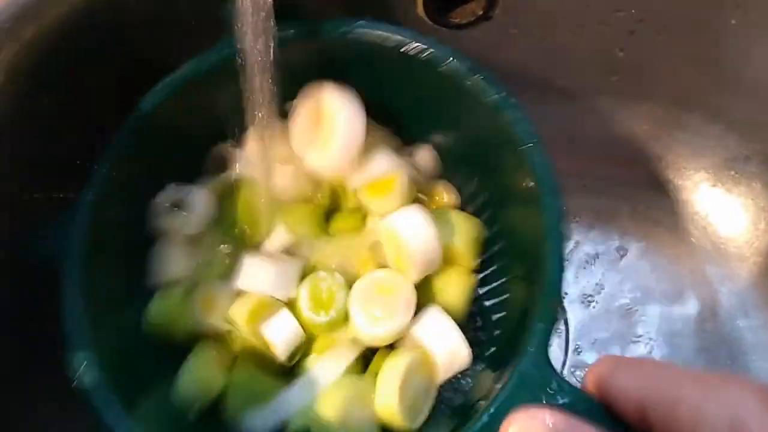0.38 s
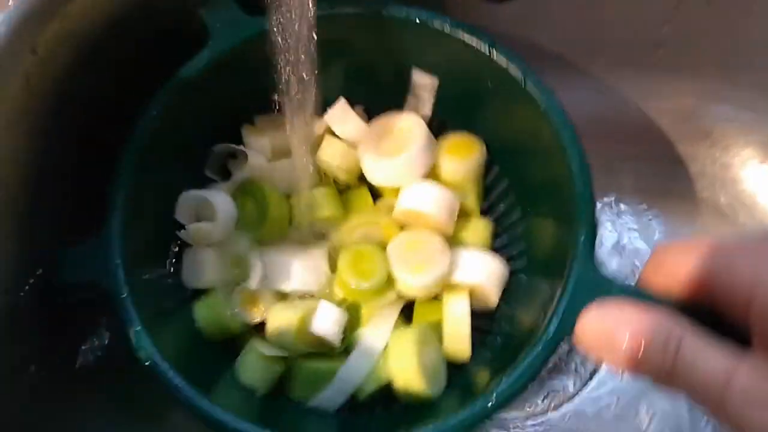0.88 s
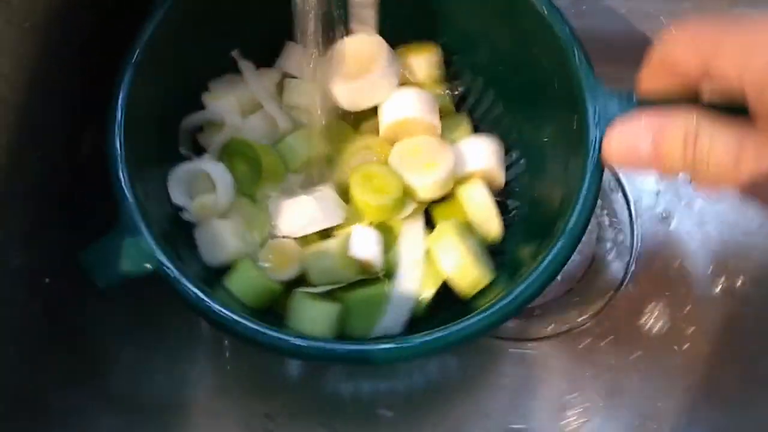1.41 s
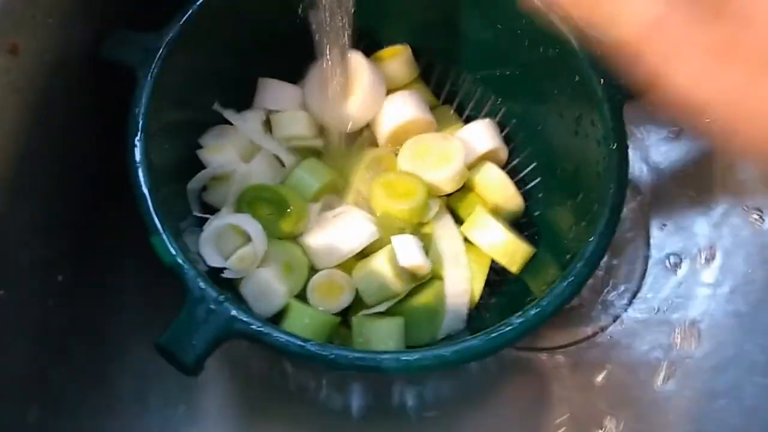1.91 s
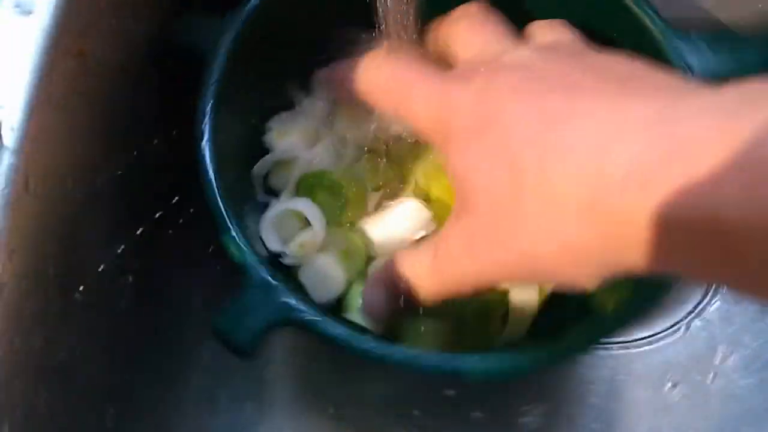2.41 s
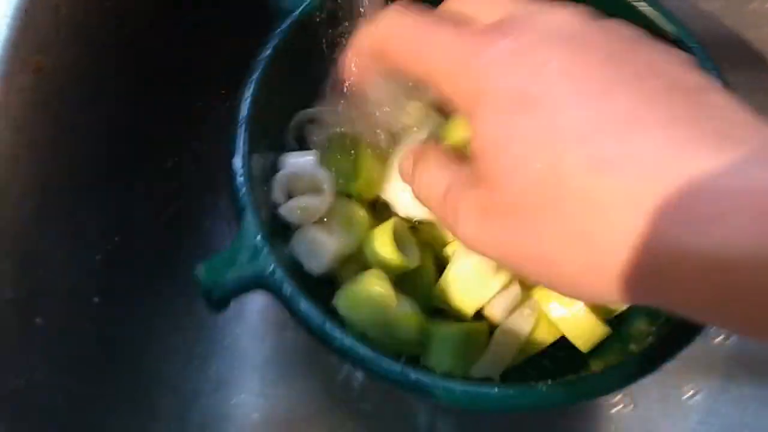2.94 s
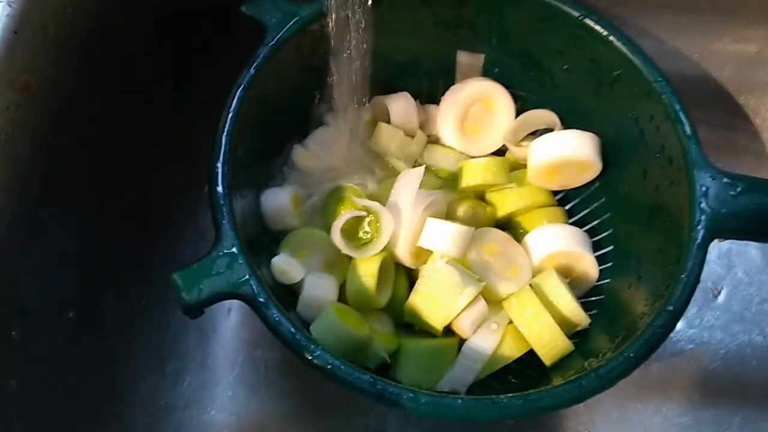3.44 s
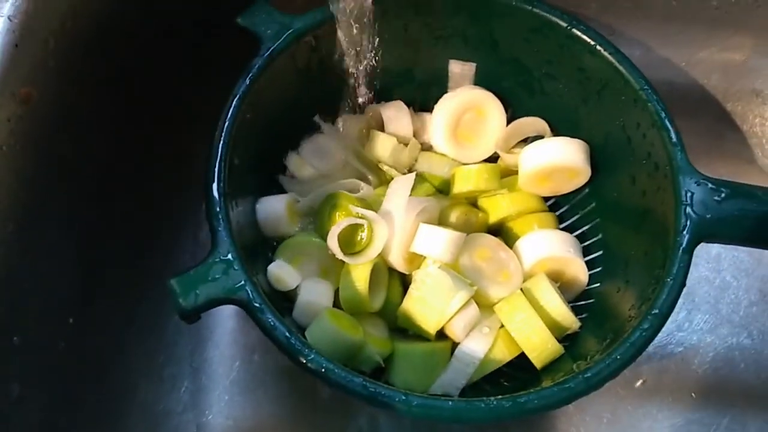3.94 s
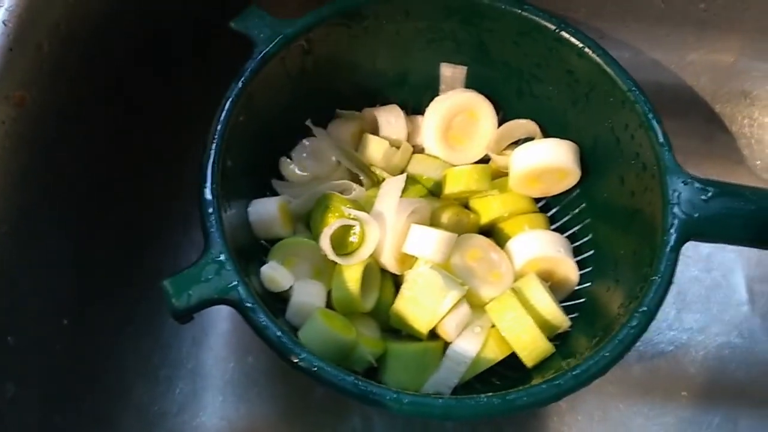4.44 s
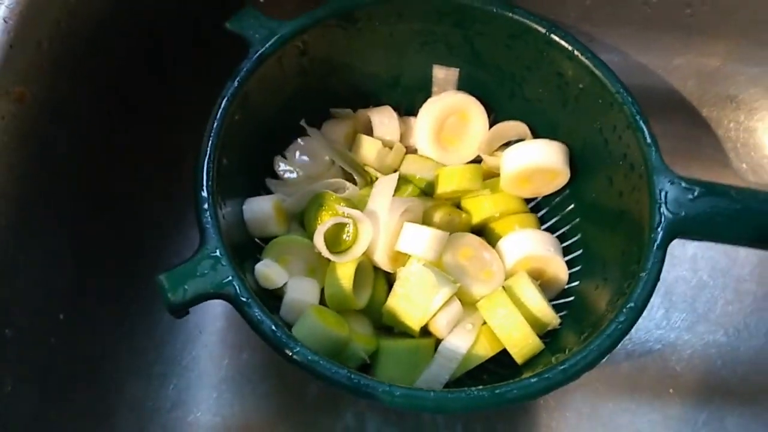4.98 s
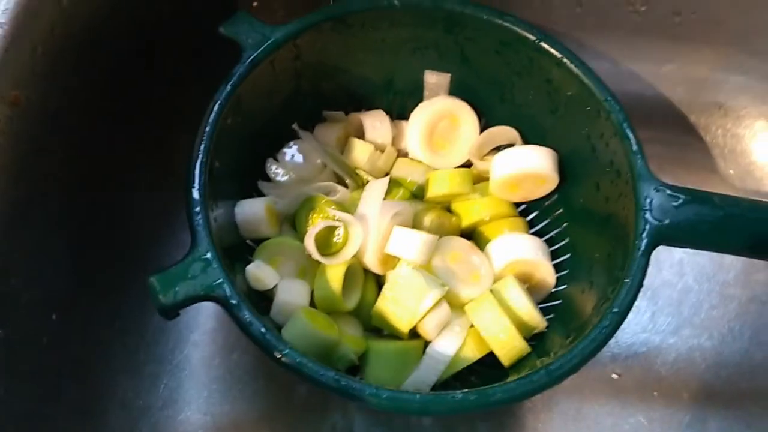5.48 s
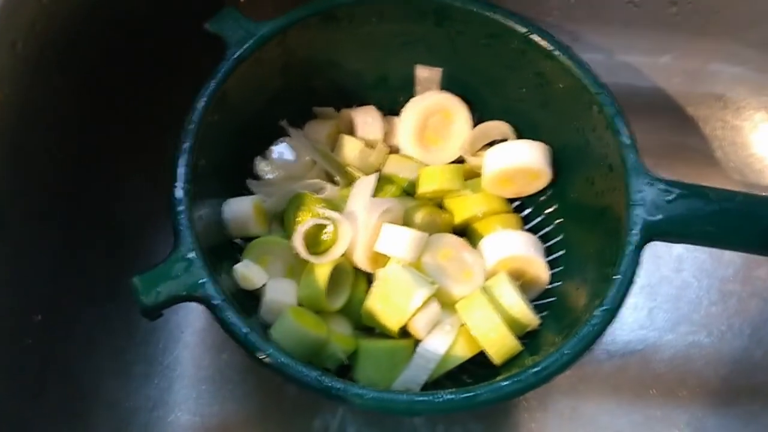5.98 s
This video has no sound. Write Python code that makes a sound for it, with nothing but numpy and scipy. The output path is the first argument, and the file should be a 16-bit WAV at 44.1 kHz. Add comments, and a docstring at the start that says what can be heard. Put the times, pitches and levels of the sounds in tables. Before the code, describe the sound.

Close stereo sound at a steel kitchen sink indoors. From 0 to 0.8 s, a colander of chopped vegetables is shaken under the tap: four or so swishing bursts of spray with plastic knocks, ending in a loud crack and metallic boom at 0.85 s. Smaller knocks follow near 1.1 s, then the steady hissing, gurgling stream returns, with spatters around 1.5 s and a knock at 1.7 s. At 2.2 s a very brief falling wet squeak leads into a hand stirring, with splashes and bumps until about 3.1 s. Crisp spatter continues, and a sharp plastic knock comes at 3.55 s. The tap closes around 4.1 s; spray collapses into last spits, then hollow drips, drumming runoff and bright tinkling drops on steel until about 5.6 s. Near quiet follows, with a small drip at 5.9 s over low room tone and faint hum.

```python
"""Knocks and thrown water come first: cut vegetables in a plastic colander, shaken in a steel sink under a tap.
Spray is dense droplets, snaps, hiss and ringing air pockets; drained water drums the modes of the basin.
Knocks crack the plastic and boom the panels, wet skin squeaks by stick-slip, narrow resonances ring briefly.
The tap is shut near 4 s and the colander drips out in tinkling drops. Room tone and a 100 Hz mains hum lie below.
Two microphone ports hear it all with a frequency-dependent lag and level, plus noise of their own."""
import sys
import numpy as np
from scipy import signal
from scipy.fft import rfft, irfft, next_fast_len
from scipy.io import wavfile

SR = 44100
rng = np.random.default_rng(int(sys.argv[2]) if len(sys.argv) > 2 else 0)


def pcm_store(signal):
    """Save signal as 16-bit PCM."""
    levels = np.round(np.clip(np.atleast_2d(signal), -1, 1) * 32767)
    wavfile.write(sys.argv[1], SR, levels.astype(np.int16).T)


def linear_from_db(decibels):
    """Turn decibels (scalar or array-like) into linear amplitude factors; 0 gives 1."""
    return 10 ** (np.asarray(decibels, float) / 20)


N = 269451


def rms_one(x):
    """Scales to rms 1."""
    return x / np.sqrt(np.mean(x ** 2) + 1e-20)


def in_time(rows, outside_db=None):
    """Interpolates each column over the scene; the first column is time_s."""
    time_s, *columns = np.transpose(rows)
    t = np.arange(N) / SR
    return [np.interp(t, time_s, column, outside_db, outside_db) for column in columns]


def at_hz(points, hz):
    """Interpolates a curve over log frequency."""
    points_hz, values = np.transpose(points)
    return np.interp(np.log(hz), np.log(points_hz), values)


def band(x, low_hz, high_hz):
    """Butterworth band-pass."""
    sos = signal.butter(2, [low_hz, min(high_hz, .45 * SR)], "band", fs=SR, output="sos")
    return signal.sosfilt(sos, x)


def drift(rate_hz):
    """Slow chance of rms 1: noise on every 40th sample through a double one-pole low-pass."""
    r = np.exp(-80 * np.pi * rate_hz / SR)
    noise = rng.standard_normal(N // 40 + 2002)
    slow = signal.lfilter([1], [1, -2 * r, r * r], noise)[2000:]  # skip the filter's start
    return np.interp(np.arange(N) / 40, np.arange(len(slow)), rms_one(slow))


def ring(clicks, hz, t60_s):
    """Damped resonator: a unit click starts a sine of initial height 1."""
    r = 1000. ** (-1 / (t60_s * SR))
    w = 2 * np.pi * hz / SR
    return signal.lfilter([0, np.sin(w)], [1, -2 * r * np.cos(w), r * r], clicks + 1e-18)


def strike(modes, contact, uneven_db):
    """Mode strengths wander with the spot that is hit; neighbouring modes move in opposite phase."""
    out = 0
    for k, (hz, level_db, t60_s) in enumerate(modes):
        push = contact * linear_from_db(uneven_db * drift(6.9))
        out = out + (-1) ** k * linear_from_db(level_db) * ring(push, hz, t60_s)
    return out


def drops(per_s, spread_db, clump_db, clump_rate_hz):
    """Random impacts of uneven size and either sign, whose rate drifts so that they clump."""
    sizes = linear_from_db(spread_db * np.minimum(rng.exponential(1, N), 3.5)) * rng.choice([-1, 1], N)
    chance = per_s * linear_from_db(clump_db * drift(clump_rate_hz)) / SR
    return sizes * (rng.random(N) < chance)


def burst(clicks, length_s, rise_s=0.0014):
    """Wet, ragged contact: each click opens a short puff of noise."""
    rise, fall = np.exp(-1 / (rise_s * SR)), np.exp(-1 / (length_s * SR))
    poles = np.convolve([1, -rise], [1, -fall])
    opening = signal.lfilter([1 - rise], poles, np.abs(clicks) + 1e-18)
    return opening * rng.standard_normal(N)


def bubbles(born, low_hz, high_hz, cycles):
    """Air pockets of mixed size: each impact rings at one of 16 pitches, down 60 dB after some cycles."""
    pitches = np.geomspace(low_hz, high_hz, num=16)
    dealt = rng.integers(0, len(pitches), N)
    ringing = sum(ring(born * (dealt == k), hz, cycles / hz) for k, hz in enumerate(pitches))
    return rms_one(band(ringing, 1.44 * low_hz, 5.8 * high_hz))


def coloured(x, spectrum, patchy_db):
    """Narrow bands, each with its own gain and flicker; signs alternate so that neighbours add; rms 1."""
    out = 0
    edges = np.geomspace(max(spectrum[0][0], 25), min(spectrum[-1][0], 16500), num=14)
    for k, (low, high) in enumerate(zip(edges, edges[1:])):
        gain = linear_from_db(at_hz(spectrum, np.sqrt(low * high)) + patchy_db * drift(38.0))
        out = out + (-1) ** k * band(x, low, high) * gain
    return rms_one(out)


SWELL_DB, FALL_PER_RISE = 17.5, 1.44  # climb within rise_s; default fall time over rise time


def swells(peak_s, rise_s, peak_db, fall_s=None):
    """Gain of brief swells: each climbs to its peak and sinks again, evenly in dB."""
    t = np.arange(0, N + 40, 40) / SR
    late_s = t[:, None] - peak_s
    if fall_s is None:
        fall_s = FALL_PER_RISE * rise_s
    rising, falling = -late_s / np.maximum(rise_s, .002), late_s / np.maximum(fall_s, .002)
    gain = linear_from_db(peak_db - SWELL_DB * np.where(late_s < 0, rising, falling))
    return np.interp(np.arange(N) / SR, t, np.sqrt(np.sum(gain ** 2, axis=1)))


# room spectrum before rms scaling: hz, relative_db
ROOM_TONE = [(25, 8.5), (70, -1.5), (150, 23), (300, 7), (600, -34.5), (1000, -38.5), (1600, -18.5),
             (2500, -33), (4000, -27.5), (9000, -19.5), (15000, -30)]
ROOM_TONE_DB = -51.5


def room():
    """Low room tone: noise in flickering bands."""
    return linear_from_db(ROOM_TONE_DB) * coloured(rng.standard_normal(N), ROOM_TONE, patchy_db=-3.0)


# mains hum level: time_s, level_db
HUM = [(0.0, -59), (0.2, -52), (0.87, -53), (1.04, -66.5), (1.75, -53.5), (1.85, -55), (2.5, -53),
       (2.67, -55), (2.84, -51.5), (3.47, -50.5), (3.76, -58), (3.91, -53), (4.44, -49), (4.99, -49),
       (5.39, -48), (6.11, -51.5)]
HUM_HZ = 100


def hum():
    """Mains hum: one sine, wavering slightly in phase and level."""
    phase = 2 * np.pi * HUM_HZ * np.arange(N) / SR + .15 * drift(1.5)
    return np.sqrt(2) * np.sin(phase) * linear_from_db(in_time(HUM)[0] + 0.42 * drift(13))


# water falling on the basin between gushes: time_s, drumming_db, high_ring_db
RUNOFF = [(0, -40.5, -36), (.8, -39, -38.5), (.9, -41, -43.5), (1.15, -61, -45), (1.5, -43.5, -34.5),
          (2, -43, -41), (2.3, -36.5, -35), (2.7, -43.5, -32.5), (2.85, -39.5, -33.5), (3.3, -37, -38),
          (3.6, -41.5, -46), (4.08, -45, -33), (4.3, -45, -39.5), (4.7, -38.5, -41), (5.15, -36, -36.5),
          (5.58, -44, -42.5), (5.7, -70, -59.5), (5.85, -78, -77), (6.11, -57, -60)]
TAP_SHUT_S = 4.1
PORT_RUMBLE_DB, PORT_HISS_DB = -57.5, -75.5
RUMBLE_FOLLOWS = .6  # share of the hum's swing in dB
LATE_NOISE_DB = -17  # against high_ring_db


def port_noise():
    """Separate at each port: low rumble, faint hiss and, after the tap is shut, faint 1.9-2.7 kHz noise."""
    white = rng.standard_normal((3, 2, N))
    shut = np.arange(N) > TAP_SHUT_S * SR
    late_gain = shut * linear_from_db(in_time(RUNOFF)[1] + LATE_NOISE_DB + 3.0 * drift(30))
    late_noise = late_gain * rms_one(band(white[2], 1900, 2700))
    hum_swing_db = in_time(HUM)[0] - HUM[-1][1]
    rumble_gain = linear_from_db(PORT_RUMBLE_DB + RUMBLE_FOLLOWS * hum_swing_db + 2.5 * drift(5))
    rumble = rumble_gain * rms_one(band(white[0], 40.0, 140.0))
    hiss = linear_from_db(PORT_HISS_DB) * rms_one(band(white[1], 1600.0, 9000.0))
    return rumble + late_noise + hiss


# brief narrow ringing in the spray, later tinkling drops: start_s, length_s, pitch_hz, level_db (before trim)
TINKLES = [(2.915, 0.037, 5300, -35), (3.345, 0.043, 5560, -31), (3.5, .045, 5300, -37.5),
           (4.12, 0.15, 3610, -51), (4.422, 0.075, 5730, -57), (4.425, 0.031, 7600, -70),
           (4.481, 0.051, 3580, -58), (4.633, .05, 8600, -65), (4.74, 0.025, 9200, -64),
           (4.76, 0.036, 5780, -64), (5.336, 0.023, 3700, -62), (5.339, .03, 4900, -51),
           (5.542, 0.015, 4630, -47), (4.407, 0.033, 11700, -62), (4.326, 0.057, 3680, -50),
           (4.416, 0.044, 5000, -57), (4.495, 0.11, 4850, -59), (4.581, 0.072, 5840, -51),
           (4.588, 0.044, 5100, -50), (4.62, 0.032, 6750, -55), (4.622, 0.087, 7300, -68),
           (4.693, 0.075, 4800, -50.5), (4.709, 0.018, 3600, -43), (4.694, 0.06, 5910, -55),
           (4.906, 0.13, 5850, -59.5), (4.958, 0.049, 4900, -53), (5.001, 0.1, 7370, -63.5),
           (5.059, 0.187, 5240, -55.5), (5.113, 0.19, 4870, -55), (5.142, 0.032, 3340, -43.5),
           (5.305, 0.16, 5870, -62.5), (5.444, 0.15, 4940, -52), (5.492, 0.088, 5280, -58),
           (5.504, 0.012, 5750, -38.5), (4.617, 0.022, 11700, -58), (4.703, 0.044, 11000, -62),
           (4.904, 0.11, 9450, -64.5), (5.257, 0.04, 9340, -69), (5.819, 0.022, 1980, -49),
           (5.865, 0.14, 2000, -47.5), (6.02, 0.084, 1990, -56), (5.878, 0.029, 4650, -48.5)]
TINKLE_TRIM_DB = -15.5


def tinkles():
    """Short runs of uneven taps each excite one narrow resonance, which rings briefly."""
    out = np.zeros(N)
    impacts = drops(170, spread_db=3.5, clump_db=3.0, clump_rate_hz=30)
    taps = rms_one(burst(impacts, .001, rise_s=.0003))
    for start_s, length_s, pitch_hz, level_db in TINKLES:
        start, stop = round(start_s * SR), round((start_s + length_s) * SR)
        run = np.append(taps[start:stop], np.zeros(SR // 20))[:N - start]  # room to ring out
        sos = signal.butter(2, [.96 * pitch_hz, 1.04 * pitch_hz], "band", fs=SR, output="sos")
        ringing = signal.sosfilt(sos, ring(run, pitch_hz, .028))
        out[start:start + len(run)] += linear_from_db(level_db + TINKLE_TRIM_DB) * ringing
    return out


# wet skin slipping on a stalk: time_s, pitch_hz, level_db
SQUEAK = [(2.212, 1776, -27), (2.22, 1684, -25.5), (2.227, 1268, -21.5), (2.238, 1284, -19),
          (2.246, 868, -24.5), (2.254, 880, -21), (2.265, 985, -26.5)]


def squeak():
    """Stick-slip slows down: a rough falling tone with two overtones."""
    pitch_hz = in_time(SQUEAK)[0]
    level_db = in_time(SQUEAK, outside_db=-120)[1]
    phase = 2 * np.pi * np.cumsum(pitch_hz * (1 + .04 * drift(200))) / SR
    tone = np.sin(phase) + 1.07 * np.sin(2 * phase) + 0.5 * np.sin(3 * phase)
    return linear_from_db(level_db + 2.5 * drift(150)) * tone


# steel basin, high modes woken by sharp drops: hz, level_db, t60_s
BASIN_HIGH = [(1940, -1, .045), (2020, -3, .04), (2560, -2, .04), (2640, 0, .04), (2890, -11, .035),
              (3120, -13, .045), (3340, -19, .04)]


def bright_ring(contact, uneven_db):
    """High basin modes, each radiating only near its own pitch."""
    out = 0
    for mode in BASIN_HIGH:
        out = out + band(strike([mode], contact, uneven_db), .93 * mode[0], 1.07 * mode[0])
    return out


# steel basin, low panel modes: hz, level_db, t60_s
BASIN = [(161.3, -3, 0.08), (170, -0.5, 0.11), (233.6, -7.5, 0.059), (258, -5.5, 0.066), (349, -14, 0.063),
         (508, -9, 0.14), (563, -3.5, 0.016), (624, -3, 0.037), (714, -15.5, 0.027), (942.6, -10.5, 0.024),
         (1257, -1.5, 0.068)]
# gushes from the slots landing on the steel: peak_s, fall_s, drumming_db
GUSHES = [(1.539, 0.042, -41), (1.833, 0.07, -34), (2.706, 0.024, -27), (2.78, 0.023, -36),
          (3.22, 0.027, -44), (3.31, 0.27, -37), (3.495, 0.05, -42.5), (4.102, 0.076, -24),
          (4.25, 0.57, -36), (4.415, 0.037, -31), (4.478, 0.11, -22), (4.811, 0.024, -31),
          (4.836, 0.039, -26.5), (4.912, 0.07, -24), (5.064, 0.04, -30.5), (5.088, 0.026, -27),
          (5.169, 0.022, -22.5), (5.22, 0.25, -32), (5.34, 0.055, -25.5), (5.462, 0.019, -25),
          (5.566, 0.057, -31.5), (5.902, 0.047, -38.5)]
# water thrown by a shake, a hand or a spit of the shut tap: peak_s, rise_s, spray_db, gurgle_db, drumming_db
SLOSHES = [(0, 0.074, -26.5, -29, -40.5), (0.188, 0.12, -26, -40.5, -51), (0.358, 0.046, -22, -27.5, -33),
           (0.512, 0.083, -26, -34, -39.5), (0.671, 0.055, -26.5, -49, -47), (0.746, 0.075, -26, -31, -43),
           (0.854, 0.014, -22.5, -17, -15), (1.074, 0.0051, -53.5, -39, -38),
           (1.128, 0.0031, -50, -30, -45), (1.679, 0.0081, -28, -67, -63),
           (1.742, 0.096, -31.5, -38, -30.5), (1.958, 0.091, -36, -37.5, -34),
           (2.24, 0.11, -25.5, -36.5, -51.5), (2.343, 0.014, -41.5, -27.5, -35),
           (2.375, 0.055, -29.5, -44.5, -43.5), (2.84, 0.12, -36, -36, -31), (2.98, 0.015, -49, -26, -39),
           (3.1, 0.07, -27, -45, -53), (3.575, 0.027, -39, -26, -29.5), (4.041, 0.026, -30, -47, -66),
           (4.134, 0.0087, -38.5, -58, -22), (4.373, 0.017, -36, -35, -44), (4.449, 0.034, -65, -31, -26),
           (4.63, 0.013, -53, -67, -43), (4.716, 0.0083, -45.5, -43, -29), (5.349, 0.016, -72, -33, -35),
           (5.4, 0.074, -79, -40, -48), (5.448, 0.015, -76, -37.5, -30)]
GUSH_RISE_S = 0.0023


def runoff():
    """Drained water on steel: soft lumps move the panel modes below 1.2 kHz, fine drops the high modes."""
    drum_db, high_db = in_time(RUNOFF)
    gush_s, fall_s, gush_db = np.transpose(GUSHES)
    slosh_s, rise_s, _, _, slosh_db = np.transpose(SLOSHES)
    gushing = np.hypot(swells(gush_s, GUSH_RISE_S, gush_db, fall_s), swells(slosh_s, rise_s, slosh_db))
    lumps = burst(drops(250, spread_db=-2.0, clump_db=0.5, clump_rate_hz=15), 0.0036)
    fine = burst(drops(420, spread_db=1.5, clump_db=3.5, clump_rate_hz=40), 0.0016, rise_s=0.00023)
    drumming = rms_one(band(strike(BASIN[:-1], lumps, uneven_db=1.2), 120, 1900))
    high_ring = rms_one(bright_ring(fine, uneven_db=5.5))
    return np.hypot(linear_from_db(drum_db), gushing) * drumming + linear_from_db(high_db) * high_ring


# plastic colander, dull modes of ribs and rim: hz, level_db, t60_s
COLANDER = [(940, -14.5, .03), (1242, -12, 0.041), (1639, -20, 0.023), (3230, -13, 0.0095),
            (5200, -17, .01)]
# colander knocks and water slaps: start_s, crack_db, boom_db, panel_hz, splash_db
BLOWS = [(0.003, -10, -19.5, 242, -29), (0.19, -13, -18, 510, -10), (0.357, -7.5, -15, 300, -22.5),
         (0.67, -12, -33, 500, -14.5), (0.655, -16.5, -19, 500, -38), (0.855, -2, -2.5, 258, -5),
         (1.068, -14.5, -21.5, 624, -27), (1.123, -11, -19, 626, -40), (1.455, -28.5, -31, 226, -16),
         (1.619, -15.5, -39, 159, -19.5), (1.728, -5.5, -10.5, 620, -20), (1.94, -16, -12, 248, -22),
         (2.318, -37.5, -15, 250, -39.5), (2.332, -12.5, -9.5, 630, -5.5), (2.384, -9, -58, 622, -22),
         (2.394, -14, -13.5, 622, -20), (2.69, -15, -55, 589, -35.5), (2.702, -19.5, -21, 181, -38.5),
         (2.776, -34, -12, 260, -32), (2.92, -38, -25.5, 158, -13), (3.087, -24.5, -9.5, 267, -24.5),
         (3.5, -13, -31, 635, -6.5), (3.524, -18, -33, 633, -16.5), (3.562, -0.5, -15.5, 159, -6),
         (4.036, -18, -29, 170, -41), (4.101, -23, -12, 624, -20), (4.323, -30, -19.5, 175, -10),
         (4.418, -33, -36, 230, -36.5)]
# heavy drips once the tap is shut: start_s, boom_db, panel_hz, bright_db
DRIPS = [(4.172, -20.5, 633, -34), (4.251, -24, 240, -58), (4.446, -7.5, 262, -29), (4.57, -23, 183, -34.5),
         (4.64, -17.5, 590, -34), (4.703, -20, 640, -29.5), (4.835, -20, 625, -67),
         (4.911, -15.5, 506, -21.5), (5.081, -12, 165, -36), (5.173, -12.5, 500, -36),
         (5.342, -17, 670, -40), (5.381, -18, 1250, -50), (5.397, -14, 1240, -42), (5.464, -23.5, 513, -57),
         (5.506, -28, 173, -29.5), (5.566, -21, 171, -50), (5.897, -28, 508, -49)]
# single drops on the steel: start_s, bright_db
PLINKS = [(4.109, -55), (4.328, -28.5), (4.356, -31.5), (4.414, -39), (4.436, -30.5), (4.481, -28),
          (4.553, -32), (4.751, -33.5), (4.842, -40), (4.867, -40), (4.981, -35.5), (5.035, -37),
          (5.066, -56), (5.137, -29.5), (5.221, -52), (5.32, -54), (5.418, -43), (5.526, -33.5),
          (5.997, -54)]
BLOW_RING_DB = -38.5  # high modes answer every blow alike
DRIP_TICK_DB = -40.5  # tick against boom
PLINK_BOOM_DB, PLINK_PANEL_HZ = 7, 485  # boom against ring; panel under the slots


def blows():
    """Short contacts: plastic crack, push on the nearest basin panel, bright ring, puff of splash."""
    knocks = [(s, crack, boom, hz, BLOW_RING_DB, linear_from_db(splash)) for s, crack, boom, hz, splash in BLOWS]
    drips = [(s, boom + DRIP_TICK_DB, boom, hz, bright, 0) for s, boom, hz, bright in DRIPS]
    plinks = [(s, -120, bright + PLINK_BOOM_DB, PLINK_PANEL_HZ, bright, 0) for s, bright in PLINKS]
    start_s, crack_db, boom_db, panel_hz, bright_db, puff = np.transpose(knocks + drips + plinks)
    at = np.round(start_s * SR).astype(int)
    clicks = np.zeros((3, N))
    clicks[:, at] = linear_from_db(crack_db), linear_from_db(bright_db), puff
    crack_clicks, bright_clicks, splash_clicks = clicks

    boom = 0
    for k, (hz, level_db, t60_s) in enumerate(BASIN):
        push = np.zeros(N)
        push[at] = linear_from_db(boom_db + level_db - 21.0 * np.abs(np.log2(hz / panel_hz)))  # dB per octave away
        boom = boom + (-1) ** k * ring(push, hz, t60_s)
    boom = band(band(boom, 160, 1400), 67, 1100)

    crack = band(burst(crack_clicks, 0.0071, rise_s=0.0011), 1100, 2800)
    crack = crack + band(0.33 * crack_clicks, 500, 3200)
    crack = crack + strike(COLANDER, crack_clicks, uneven_db=3.5)
    bright = bright_ring(burst(bright_clicks, 0.00064, rise_s=0.0017), uneven_db=3)
    splash = band(burst(splash_clicks, 0.0013, rise_s=0.00017), 1800, 5900)
    return crack + boom + bright + splash


# running water between the sloshes: time_s, spray_db, gurgle_db
FLOW = [(0, -62.5, -46.5), (.83, -33, -42), (.9, -43, -61), (1.05, -40, -41), (1.36, -38.5, -46.5),
        (1.5, -34, -45), (2.1, -33.5, -43.5), (2.45, -35.5, -41.5), (2.65, -27.5, -45.5),
        (2.93, -30.5, -41.5), (3.22, -31.5, -41), (3.35, -27, -43), (3.54, -28.5, -44.5),
        (3.62, -36.5, -49.5), (3.73, -29, -42), (4.02, -42.5, -47), (4.15, -40.5, -46.5), (4.24, -62, -81),
        (4.44, -48.5, -60), (4.55, -77.5, -61.5), (5, -69, -59), (5.3, -71, -70), (6.11, -74, -79)]
# spray spectrum before rms scaling: hz, relative_db
SPRAY = [(600, -27.5), (1200, 3.5), (2000, 5), (3000, 3.5), (4500, 9.5), (6000, 2.5), (7500, -4.5),
         (10000, 4.5), (12500, -21.5), (15500, 5)]
# gobs of water bursting on a stalk or rib: peak_s, fall_s, spray_db
SPATS = [(0.295, 0.028, -28), (0.357, 0.01, -36), (.671, .01, -42), (.747, .01, -35), (1.068, 0.017, -32.5),
         (1.123, 0.017, -28.5), (1.457, .02, -25.5), (1.493, .008, -22), (1.619, .01, -33.5),
         (1.637, .008, -43), (1.727, 0.0196, -31.5), (1.914, .01, -36), (2.061, 0.0091, -24.5),
         (2.098, .01, -29), (2.161, 0.015, -22), (2.331, 0.0094, -26.5), (2.385, .01, -31.5),
         (2.69, .01, -31.5), (2.709, .01, -25.5), (2.875, 0.007, -18.5), (2.918, 0.0076, -21.5),
         (2.947, .008, -26), (3.106, .01, -28.5), (3.328, .01, -29.5), (3.395, 0.0051, -23),
         (3.5, .012, -41.5), (3.561, 0.0083, -28), (3.753, .01, -25), (4.018, 0.0084, -37),
         (4.035, 0.0096, -33), (4.123, 0.025, -26), (4.19, 0.0054, -34), (4.281, 0.041, -39.5),
         (4.324, 0.034, -32.5), (4.372, 0.0067, -35.5), (4.412, .03, -48), (4.572, .01, -51),
         (5.891, .01, -56)]
SPAT_RISE_S = .002
DRIBBLE_PER_S = 2600  # droplet rate after TAP_SHUT_S


def tap():
    """The jet shatters into dense droplets, lone snaps and fizz over a hiss; larger air pockets gurgle."""
    running = np.arange(N) < TAP_SHUT_S * SR
    droplet_rate = np.where(running, 4000, DRIBBLE_PER_S)
    droplets = rms_one(drops(droplet_rate, spread_db=1.5, clump_db=1.5, clump_rate_hz=24))
    lone = drops(80, spread_db=7.5, clump_db=3.5, clump_rate_hz=16)
    snaps = rms_one(burst(lone, 0.0012, rise_s=0.0002))
    hiss = rng.standard_normal(N) * linear_from_db(0.5 * drift(25))
    jet = droplets + np.where(running, 1, .5) * (1.07 * hiss + 0.59 * snaps)
    spray = coloured(jet, SPRAY, patchy_db=4.0)
    small = drops(700, spread_db=5.0, clump_db=5.5, clump_rate_hz=20)
    fizz = bubbles(small, 2600, 9000, cycles=40.0)

    pockets = drops(1100, spread_db=4.0, clump_db=3.0, clump_rate_hz=21)
    plastic = rms_one(strike(COLANDER[:3], pockets, uneven_db=5.0))
    gurgle = bubbles(pockets, 330.0, 2000, cycles=17.6) + 0.88 * plastic

    spray_db, gurgle_db = in_time(FLOW)
    slosh_s, rise_s, thrown_db, gulp_db, _ = np.transpose(SLOSHES)
    spat_s, fall_s, spat_db = np.transpose(SPATS)
    thrown = np.hypot(swells(slosh_s, rise_s, thrown_db), swells(spat_s, SPAT_RISE_S, spat_db, fall_s))
    spray_gain = np.hypot(linear_from_db(spray_db), thrown)
    gurgle_gain = np.hypot(linear_from_db(gurgle_db), swells(slosh_s, rise_s, gulp_db))
    return spray_gain * (spray + linear_from_db(-10.0) * fizz) + gurgle_gain * gurgle


def sink():
    """Everything in and around the basin."""
    return tap() + runoff() + tinkles() + blows() + squeak() + room()


# phase lead of the left port: hz, lead_rad
LEFT_LEADS = [(0, 0), (1380, 0), (1890, -2.9), (2100, -np.pi), (2580, -np.pi), (3270, -6), (3700, -6.3),
              (4310, -8.8), (4910, -9.5), (5430, -11.5), (6120, -12.2), (7060, -12.6), (15600, -12.6)]
# left level over right: hz, difference_db
LEFT_OVER_RIGHT = [(60, -3), (99, -5), (160, 0), (270, -2.5), (450, -.5), (740, -1), (1220, .5), (1700, 3),
                   (2100, 0), (2500, 0), (3330, -2), (5500, -3.5), (8000, -6), (11000, -7.5), (13000, 0)]
# share of the sound common to both ports: hz, share_0_to_1
COMMON = [(40, .6), (100, .6), (170, .88), (300, .82), (500, .7), (1130, .995), (1300, .9), (1600, .4),
          (1800, .45), (1950, .8), (2060, .93), (2160, .997), (2480, .997), (2560, .9), (2660, .68),
          (2800, .42), (3500, .85), (4100, .5), (4700, .85), (5300, .5), (5800, .75), (6800, .45),
          (7050, .94), (8000, .9), (11000, .8), (13500, .6), (15000, .8)]


def ports(direct, scattered):
    """Both ports share the direct sound, shifted in phase; basin-wall scatter is added in opposite phase."""
    size = next_fast_len(N + SR // 4)
    hz = np.maximum(np.arange(size // 2 + 1) * SR / size, 1)
    common = np.clip(at_hz(COMMON, hz), 0, 1)
    side = np.array([[.5], [-.5]])  # left, right
    shared = np.sqrt((1 + common) / 2) * rfft(direct, size)
    unshared = 2j * side * np.sqrt((1 - common) / 2) * rfft(scattered, size)
    lead_rad = np.interp(hz, *np.transpose(LEFT_LEADS))
    lean = linear_from_db(side * at_hz(LEFT_OVER_RIGHT, hz)) * np.exp(1j * side * lead_rad)
    return irfft((shared + unshared) * lean, size)[:, :N]


def scene():
    """Two independent draws of sink and hum serve as direct and scattered sound."""
    return ports(sink() + hum(), sink() + hum()) + port_noise()


def band_limit(x):
    """A steep low-pass at the top of the band."""
    return signal.sosfilt(signal.butter(12, 15980, fs=SR, output="sos"), x)


def record(dry):
    """Stores the finished mix."""
    return band_limit(dry)


dry = scene()
out = record(dry)
pcm_store(out)
```